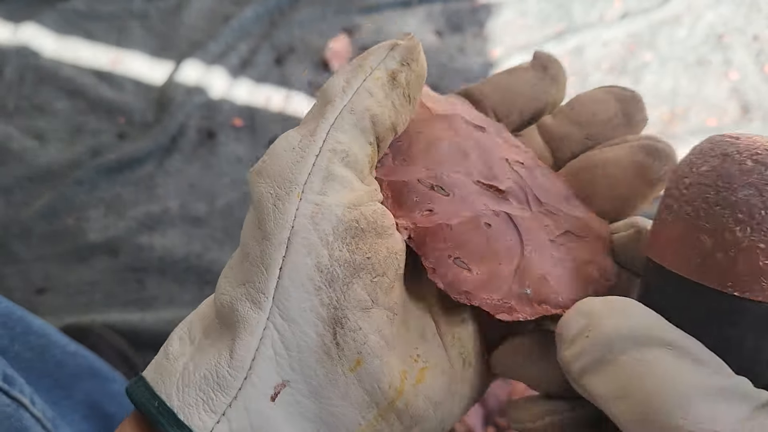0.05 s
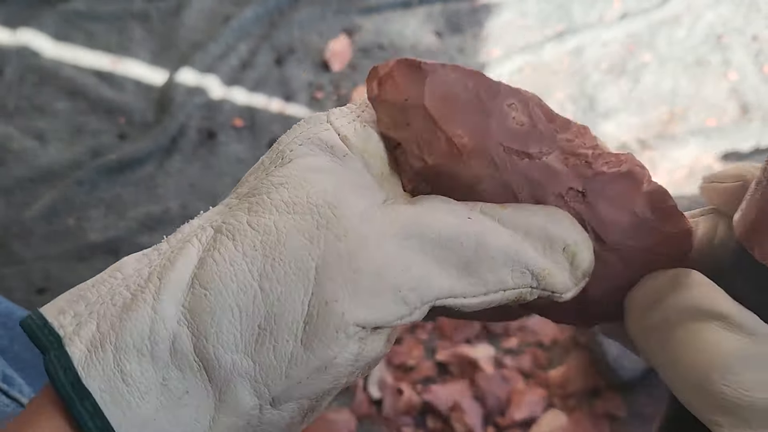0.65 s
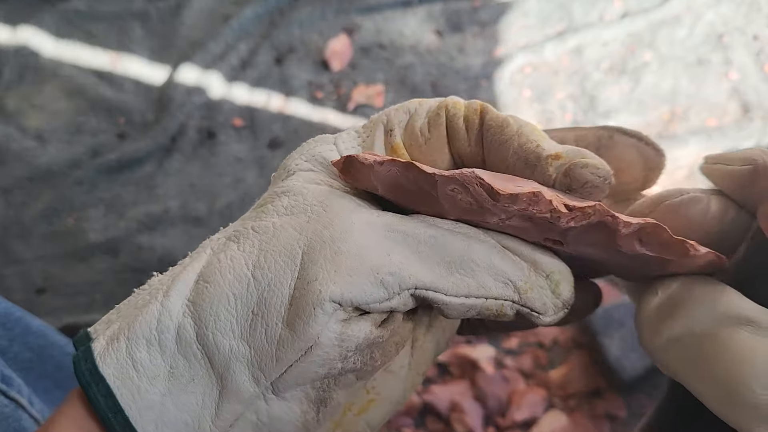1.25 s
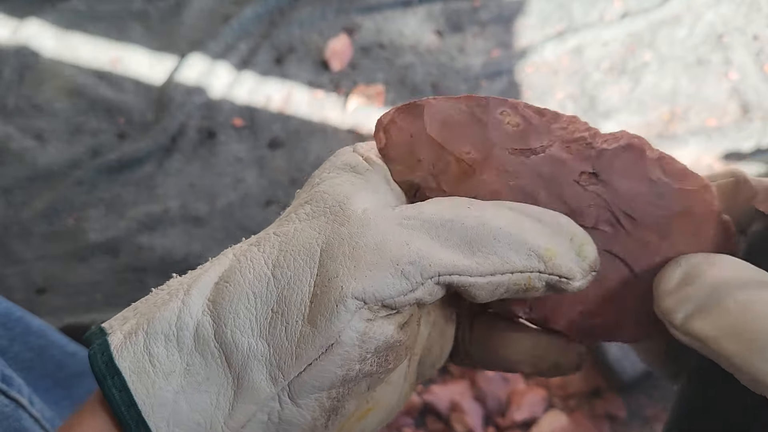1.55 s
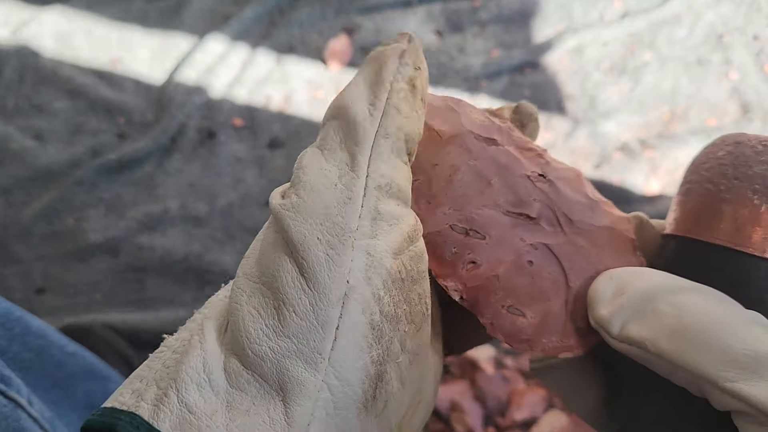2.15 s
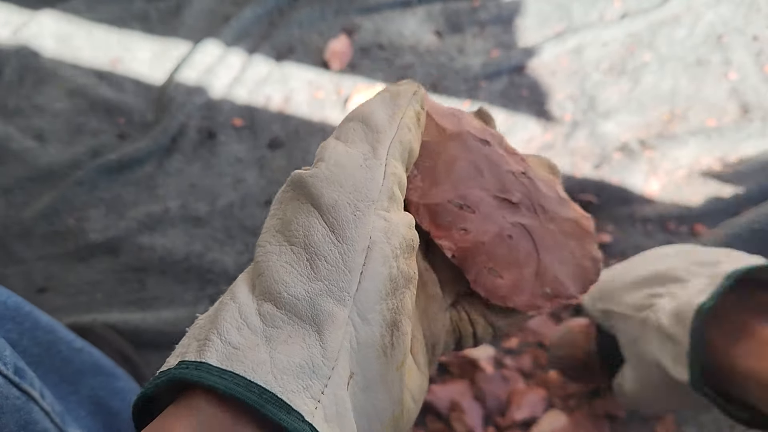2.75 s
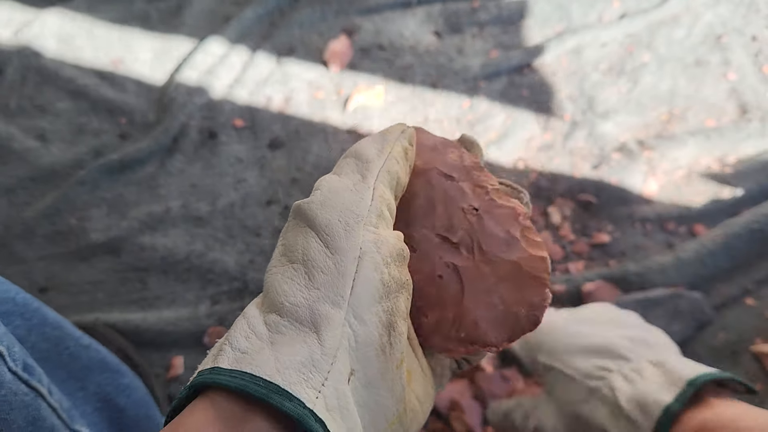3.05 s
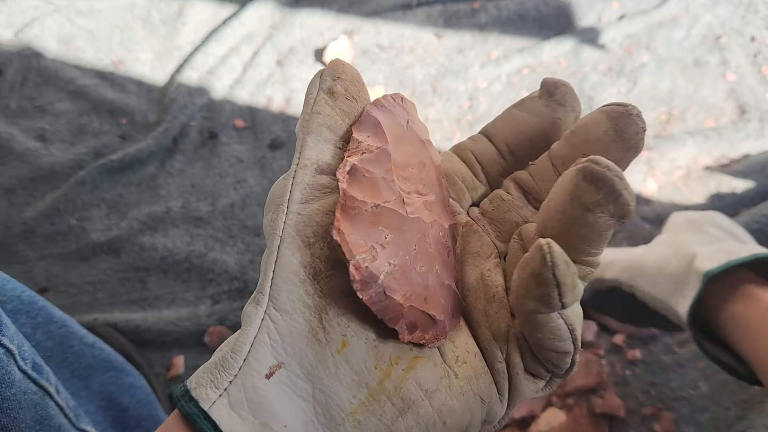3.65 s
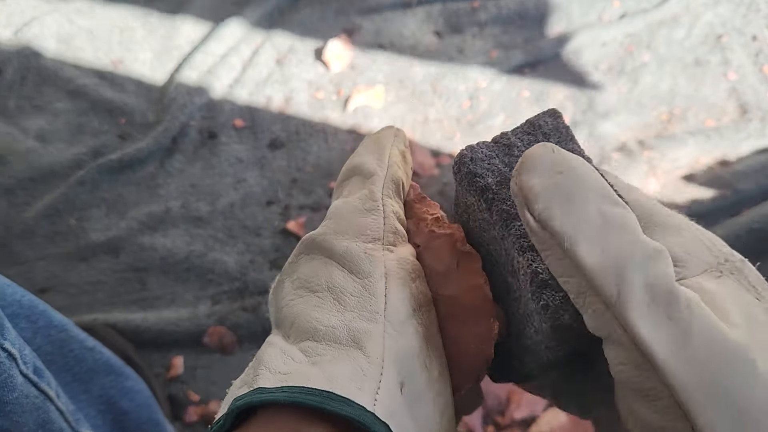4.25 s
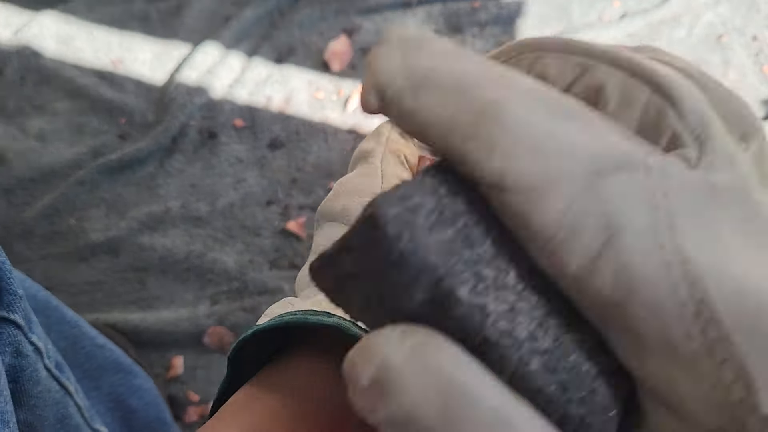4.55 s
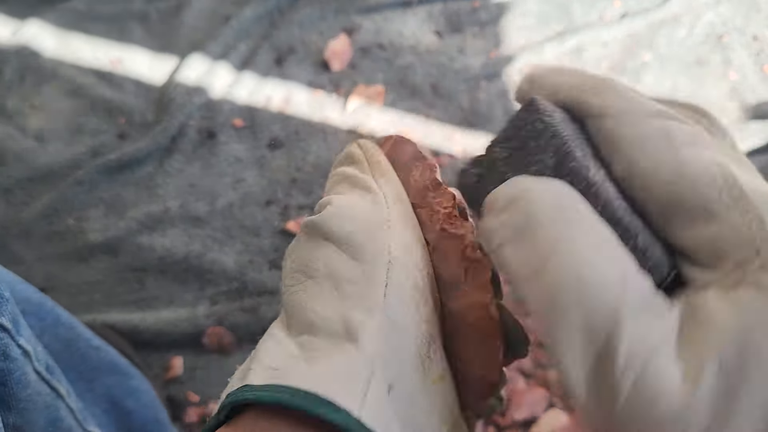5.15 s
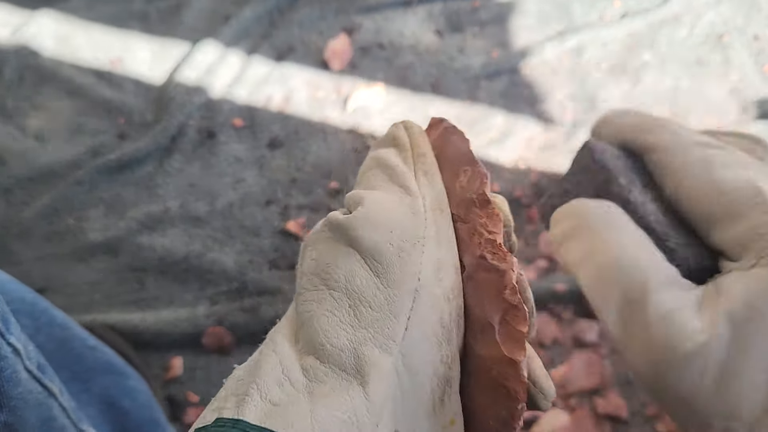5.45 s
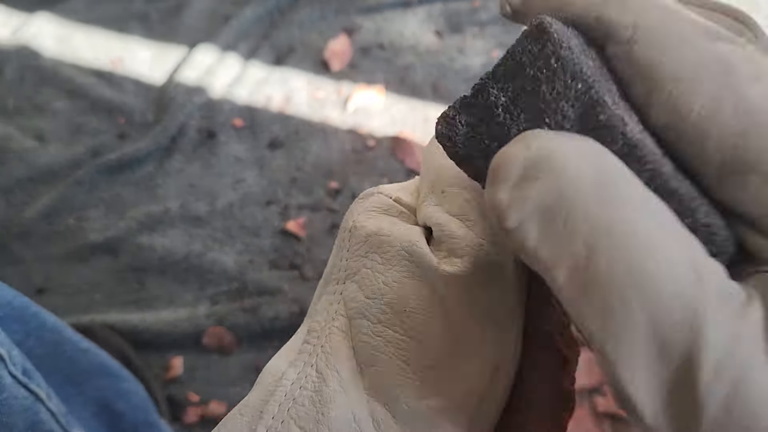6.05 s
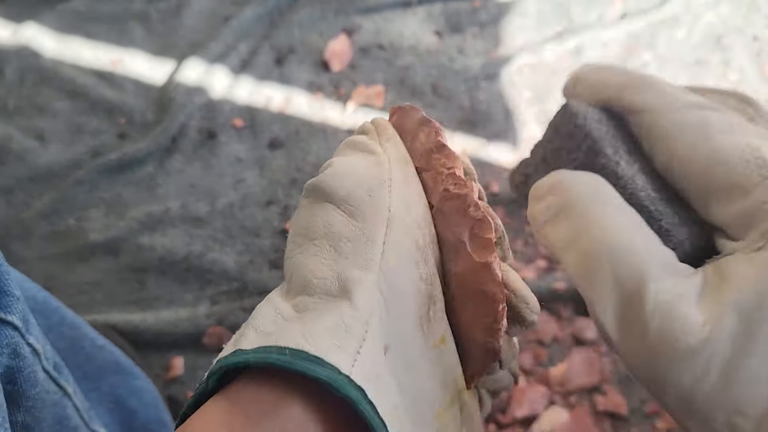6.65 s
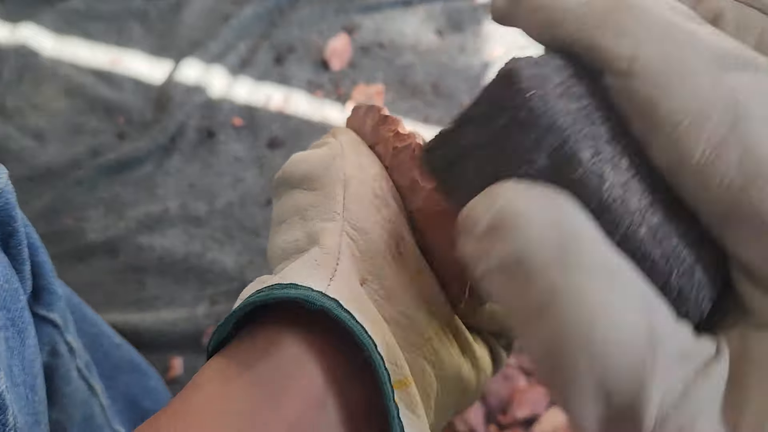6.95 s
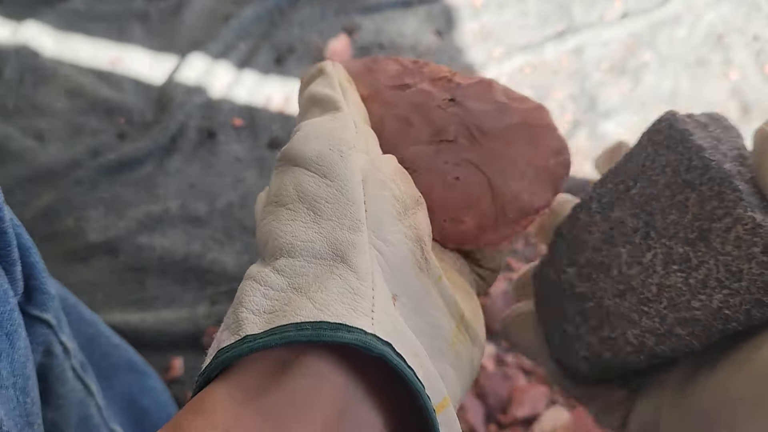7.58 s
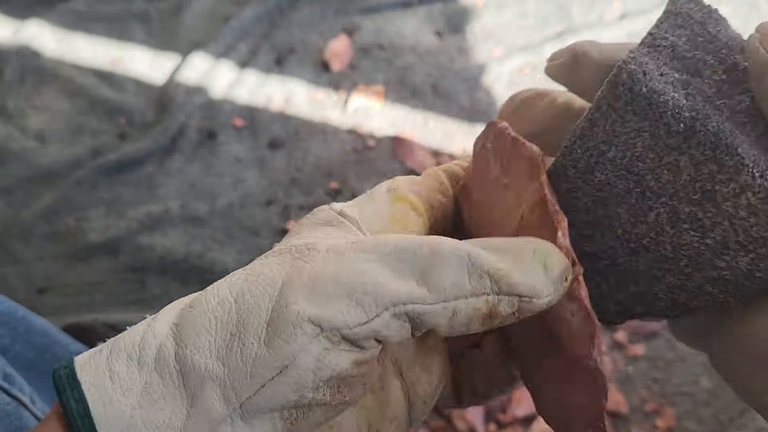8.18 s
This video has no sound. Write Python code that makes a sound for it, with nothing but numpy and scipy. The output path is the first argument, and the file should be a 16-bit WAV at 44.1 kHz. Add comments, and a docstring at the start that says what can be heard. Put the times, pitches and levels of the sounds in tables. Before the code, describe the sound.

Close, dry sounds of stone being worked by hand. Faint glove rubbing and low handling rumble come first, then loose chips crunch and clink twice as a tool lands on them. An abrading stone rasps along the edge of a chert blade, about four brief strokes a second, a dozen in all. It ends with delicate stone-on-stone clicks and thin, high ringing against quiet room noise.

```python
"""Abrading a chert blade

Gloved hands turn a chert blade in a quiet workspace; a tool set down among waste flakes makes them
chink. A coarse abrader is swiped twelve times along the edge: it lands, skips and grinds from tooth to
tooth. Each impact excites the damped modes of the gripped stones (a knock) and of the blade (a ring).
Light touches, mostly before and after the swipes, let the loosely held blade ring longer."""
import sys
import numpy as np
from scipy import signal
from scipy.fft import rfft, irfft, next_fast_len
from scipy.io import wavfile
from scipy.ndimage import map_coordinates

SR = 44100
rng = np.random.default_rng(int(sys.argv[2]) if len(sys.argv) > 2 else 0)


def materialize(psi):
    """Save the field psi as 16-bit PCM at rate SR to the path in sys.argv[1].

    A 1-D psi becomes a single channel; in a 2-D psi each row is a channel.
    """
    bounded = np.clip(np.atleast_2d(psi).T, -1, 1)
    quanta = np.round(bounded * 32767).astype(np.int16)
    wavfile.write(sys.argv[1], SR, quanta)


N = 366912

# Dull resonances of the gripped stones, and the blade's bending modes damped by the grip.
# Each row: frequency in Hz, bandwidth in Hz, relative level in dB, left minus right in dB.
KNOCK_MODES = [(218, 88, -21, -4), (639, 170, -15, -0.5), (977, 270, -15.5, 1), (1408, 343, -3.5, -8),
               (1893, 350, -1, -4.5), (2078, 520, 0, -5), (3050, 1430, -2, -3), (4960, 1720, -1, 3.5)]
BLADE_MODES = [(6800, 620, -4, 0), (7170, 540, 0, -3), (10600, 1000, -12.5, 3), (11800, 1000, -14.5, 2),
               (15200, 420, -11, -4)]
# Strokes of the abrader. Each row: landing time, skip and grind durations in seconds, teeth caught,
# landing, tooth and grit levels in dB, ring offset in dB, knock pitch factor,
# ring tilt in dB per octave, jolt of the hands in dB.
SWIPES = [(4.6382, .020, .0435, 3, -12.5, -15.5, -37, 0.6, 1.057, -4, -31.5),
          (4.9143, 0.019, 0.031, 4, -14.5, -20, -20, -5.5, 1.05, -4.5, -37.5),
          (5.1733, 0.012, 0.029, 4, -16.5, -18.5, -23, -7, 1.077, -3, -34),
          (5.4108, 0.012, .034, 4, -12.5, -18, -23, -8, 1.057, -2.5, -31),
          (5.652, 0.017, .027, 4, -13.5, -15.5, -23.5, -3.5, 1.045, -0.5, -37.5),
          (5.889, 0.014, 0.037, 5, -17.5, -21.5, -27, 3.5, 1.01, 3, -39.5),
          (6.126, 0.011, 0.025, 4, -20, -21, -25, 2.5, 1, -9.5, -32),
          (6.362, 0.014, .02, 2, -18, -17.5, -25.5, 3.5, 1.05, -11, -34),
          (6.5974, .014, 0.031, 4, -14.5, -17, -27, -7.5, 1.026, -3, -39.5),
          (6.8326, .018, 0.023, 4, -13, -15.5, -24.5, -8, 1, 1, -35.5),
          (7.0778, 0.021, 0.041, 4, -16, -18, -26, -0.5, 1.03, -5.5, -23.5),
          (7.317, 0.021, 0.023, 3, -12, -20, -23.5, 0, 0.95, -0.5, -32.5)]


def amp(db):
    """Decibels to amplitude ratio."""
    return 10 ** (np.asarray(db) / 20)


def unit(x):
    """The signal scaled to rms 1."""
    return x / np.sqrt(np.mean(x ** 2) + 1e-20)


def clock(seconds):
    """Sample times over a duration."""
    return np.arange(int(seconds * SR)) / SR


def along(points, hz):
    """Interpolation of (Hz, value) points on a logarithmic frequency axis."""
    knots_hz, values = np.transpose(points)
    return np.interp(np.log(hz + 1), np.log(knots_hz), values)


def wobble(rate):
    """Smooth random modulation with `rate` knots a second."""
    knots = rng.standard_normal(int(N * rate / SR) + 4)
    return map_coordinates(knots, [np.arange(N) * rate / SR])


def arch(start, end):
    """Half-sine speed of one movement, from rest to rest."""
    speed = np.zeros(N)
    i = np.arange(max(int(start * SR), 0), min(int(end * SR), N))
    speed[i] = np.sin(np.pi * (i / SR - start) / (end - start))
    return speed


def filtered(x, response):
    """Linear filtering: the spectrum is multiplied by a frequency response."""
    size = x.shape[-1]
    padded = next_fast_len(size + 8192)
    return irfft(rfft(x, padded) * response(np.fft.rfftfreq(padded, 1 / SR)), padded)[..., :size]


def noise(spectrum, side_db, pan_db=0, size=N):
    """Coloured noise of rms 1; an independent side signal decorrelates the channels."""
    mid, side = filtered(rng.standard_normal((2, size)), lambda hz: amp(along(spectrum, hz)))
    side = amp(side_db) * side
    return unit(np.array([amp(pan_db) * (mid + side), mid - side]))


def add(track, start, sound):
    """Superposition of a stereo sound on a track, from `start` seconds."""
    part = track[:, round(start * SR):][:, :sound.shape[1]]
    part += sound[:, :part.shape[1]]


def in_room(sound, wet_db, build_s=0.0054):
    """Reverberation: a diffuse tail builds up behind the direct sound and decays exponentially."""
    # Decay of the room. Each row: frequency in Hz, T60 in seconds.
    decay_times = [(200, 0.16), (1500, 0.12), (7000, 0.13), (15000, 0.14)]
    hz, t, spectra = signal.stft(rng.standard_normal((2, SR // 3)), SR, nperseg=256)
    tail = signal.istft(spectra * amp(-60 * t / along(decay_times, hz)[:, None]), SR, nperseg=256)[1]
    tail *= 1 - np.exp(-np.arange(tail.shape[1]) / SR / build_s)
    response = amp(wet_db) * tail / np.linalg.norm(tail[0])
    response[:, 0] += 1
    return signal.fftconvolve(sound, response, axes=1)


def near_reflections(sound, echo_db=-16.5, count=9):
    """Comb filtering: weak echoes from hands, abrader and lap interfere anew in each pose."""
    paths = np.zeros((2, SR // 50))
    paths[:, 0] = 1
    delays_s = rng.uniform(.0008, .008, (count, 1)) + rng.uniform(0, .0002, (count, 2))
    for delay, sign in zip(delays_s, rng.choice([-1, 1], count)):
        paths[[0, 1], (delay * SR).astype(int)] += sign * amp(echo_db)
    return signal.fftconvolve(sound, paths, axes=1)


def background(air_db=1, hum_db=-1):
    """Broadband room noise swells slowly, with narrow noise bands heard as a faint hum and whir."""
    # Course of the room noise. Each row: time in seconds, level in dB.
    air_levels = [(1.8, -60.5), (3.4, -56), (7.7, -55.5), (8.2, -51.5)]
    # Its spectrum. Each row: frequency in Hz, relative density in dB.
    air_spectrum = [(59, -62), (100, -12), (135, -3.5), (234, -14.5), (365, -15), (492, -20), (558, -19),
                    (1130, -18), (1330, -19), (2270, -19.5), (3780, -26.5), (5080, -26), (6290, -34.5),
                    (7770, -32), (16000, -61.5)]
    # Hum and whir. Each row: centre in Hz, half width in Hz, level in dB.
    hum_bands = [(229.2, 10, -61), (304.5, 16, -65), (381.2, 7.7, -69.5), (2250, 220, -70)]
    level = amp(np.interp(np.arange(N) / SR, *np.transpose(air_levels)))
    hum = 0
    for centre, width, db in hum_bands:
        band = filtered(rng.standard_normal(N), lambda hz: np.exp(-((hz - centre) / width) ** 2))
        hum += amp(db + hum_db) * unit(band)
    return level * amp(air_db) * noise(air_spectrum, side_db=0, pan_db=-1.5) + unit(level) * hum


def handling(still_db=-55, waver_db=2.4, flutter_db=3):
    """Friction noise follows speed: moving hands rumble and rub leather over stone."""
    # Turns and regrips. Each row: start and end in seconds, rumble, scuff and hiss levels in dB.
    moves = [(-.05, .187, -68, -59.5, -66.5), (.21, 0.364, -46, -87, -96), (0.506, 0.645, -43, -68, -69.5),
             (0.606, 0.862, -47, -58.5, -64), (1.178, 1.41, -40, -65.5, -72),
             (1.367, 1.63, -44, -65.5, -84), (1.59, 1.896, -41, -67, -66), (1.747, 2.244, -47.5, -61, -61),
             (2.313, 2.7, -70, -63, -63.5), (2.63, 2.797, -39.5, -74, -74), (2.822, 3.026, -36, -70, -80),
             (3.035, 3.138, -36, -56, -52.5), (3.09, 3.464, -45.5, -76, -56),
             (3.792, 3.996, -38.5, -74, -71), (4.11, 4.353, -49, -54.5, -62.5),
             (4.476, 4.592, -48.5, -67, -78), (7.428, 7.672, -41.5, -74, -62), (7.69, 7.904, -38, -76, -68),
             (7.897, 8.26, -45, -59.5, -66)]
    # The arm's return swing between swipes: rumble, scuff and hiss levels in dB.
    return_db = (-50, -84.5, -72.5)
    # Spectra of the hands and gloves. Each row: frequency in Hz, relative density in dB.
    rumble_spectrum = [(15, -47), (25, -10), (45, -7), (63, -1.5), (90, -8), (130, -12.5), (180, -25.5),
                       (260, -30.5), (400, -54), (800, -107)]
    scuff_spectrum = [(500, -22.5), (900, -10.5), (1400, -2), (2000, -14), (4000, -21.5), (9000, -63)]
    hiss_spectrum = [(1000, -21.5), (2500, -11), (5000, -9), (8000, -11.5), (16000, -21)]
    return_after_s, return_s = 0.084, 0.13
    jolt_lead_s, jolt_s = 0.012, 0.09  # the hands give way under each swipe
    returns = [(s + return_after_s, s + return_after_s + return_s, *return_db) for s, *_ in SWIPES[:-1]]
    sway, scuff, hiss = sum(amp(db)[:, None] * arch(start, end) for start, end, *db in moves + returns)
    jolts = sum(amp(db) * arch(s - jolt_lead_s, s - jolt_lead_s + jolt_s) for s, *_, db in SWIPES)
    motion = np.hypot(amp(still_db), sway + jolts) * amp(waver_db * wobble(22))
    rumble = motion * noise(rumble_spectrum, side_db=-12.5, pan_db=1.5)
    rustle = scuff * noise(scuff_spectrum, side_db=1) + hiss * noise(hiss_spectrum, side_db=0.5)
    return rumble + amp(flutter_db * wobble(70)) * rustle


def flake_pile(grain_db=4, chink_rise_s=0.0006, thud_rise_s=0.0019):
    """Impact of a tool set down: flakes vibrate freely, chips crunch and the ground thuds."""
    # Modes of each waste flake. Each row: frequency in Hz, relative level in dB, T60 in seconds.
    flake_modes = {"broad": [(6320, 3, 0.13), (11950, -7, .16)], "thin": [(10440, -3, 0.15),
                   (12200, -8, 0.12), (4600, -9, .07)], "small": [(7770, 4, 0.027), (12650, -20, 0.095)],
                   "sliver": [(15650, 0, 0.17)]}
    # Blows on the flakes. Each row: start in seconds, flake, level in dB.
    chinks = [(3.066, "thin", -28), (3.067, "broad", -37.5), (3.156, "thin", -41), (3.193, "broad", -29),
              (3.209, "sliver", -28), (3.226, "broad", -27.5), (3.236, "small", -16),
              (3.236, "sliver", -25), (3.29, "small", -28.5), (3.337, "sliver", -45),
              (3.352, "broad", -39.5), (3.575, "small", -51)]
    # Loose chips shifting. Each row: start in seconds, level in dB, rise and T60 in seconds.
    crunches = [(0.105, -39, 0.0013, 0.032), (3.065, -14, 0.0027, 0.046), (3.076, -45, 0.0019, 0.099),
                (3.17, -39.5, 0.0052, 0.15), (3.229, -27, 0.005, 0.061), (3.35, -49, 0.0023, 0.062)]
    # The tool's weight landing. Each row: start in seconds, level in dB, T60 in seconds.
    thuds = [(3.076, -16.5, 0.037), (3.237, -37.5, 0.12)]
    # Spectra of chips and ground. Each row: frequency in Hz, relative density in dB.
    chip_spectrum = [(300, -16.5), (1200, -22.5), (3000, -11.5), (4700, -4.5), (7000, 0), (12000, 2.5),
                     (16000, 4)]
    ground_spectrum = [(25, -5), (50, 2), (120, -0.5), (300, -12.5), (520, -8), (800, -20), (2000, -33),
                       (4000, -37)]
    out, t = np.zeros((2, N)), clock(0.16)
    for start, flake, blow_db in chinks:
        for hz, db, t60 in flake_modes[flake]:
            phase = np.array([[0], [rng.uniform(-2.9, 0.67)]])
            envelope = amp(blow_db + db - 60 * t / t60) * (1 - np.exp(-t / chink_rise_s))
            ring = envelope * np.sin(2 * np.pi * hz * t + phase) * amp([[-1], [1]])
            add(out, start, in_room(ring, wet_db=-6.5))
    for start, db, rise, t60 in crunches:
        grains = unit(np.repeat(amp(grain_db * rng.standard_normal(len(t))), 32)[:len(t)])
        envelope = np.minimum(t / rise, 1) * amp(db - 60 * np.maximum(t - rise, 0) / t60)
        chips = noise(chip_spectrum, side_db=2, pan_db=-0.5, size=len(t))
        add(out, start, in_room(envelope * grains * chips, wet_db=-4))
    for start, db, t60 in thuds:
        envelope = amp(db - 60 * t / t60) * (1 - np.exp(-t / thud_rise_s))
        add(out, start, envelope * noise(ground_spectrum, side_db=-12.5, size=len(t)))
    return out


def modal_ring(modes, detune, rise_s=0.000094, left_lag_s=0.00017):
    """Free vibration as a sum of damped sines; the spot struck shifts and weights each mode."""
    hz, width, db, pan = np.transpose(modes)[:, :, None]
    shift, strength, lean = rng.standard_normal((3, len(hz), 1))
    hz, db, pan = hz + detune * width * shift, db + 3 * strength, pan + 3 * lean
    polarity = (-1) ** np.arange(len(hz))[:, None]
    channels = []
    for side, delay in ((1, rng.normal(left_lag_s, .00002)), (-1, 0)):
        t = np.maximum(clock(np.pi / width.min()) - delay, 0)
        gain = polarity * np.sqrt(width) * amp(db + side * pan / 2)
        partials = gain * np.exp(-np.pi * width * t) * np.sin(2 * np.pi * hz * t)
        channels.append(partials.sum(0) * (1 - np.exp(-t / rise_s)))
    ring = np.array(channels)
    return ring / np.sqrt(np.mean(ring[:, :132] ** 2))  # rms 1 over the first 3 ms


def gripped(modes, pitch, tilt_db, vary_db=0.82):
    """Boundary conditions: each grip retunes the modes and changes their strengths."""
    hz, width, db, pan = np.transpose(modes)
    db = db + tilt_db * np.log2(hz / hz[0]) - vary_db * rng.standard_normal(len(hz))
    return np.transpose([hz * pitch, width, db, pan])


def toward_tip(knock_db, ring_db, place, fade_db=1.5, rise_db=5):
    """Excitation depends on position: toward the tip (place 0 to 1) knock fades and ring grows."""
    knock_db, ring_db = rng.normal([knock_db, ring_db], 1)
    return knock_db - fade_db * (place - .5), ring_db + rise_db * (place - .5)


def impact(knock_db, ring_db, knock=KNOCK_MODES, ring=BLADE_MODES):
    """Impulsive excitation: the stones knock, and the blade rings as the contact lets go."""
    sound = np.zeros((2, SR // 40))
    add(sound, 0, amp(knock_db) * modal_ring(knock, detune=.25, rise_s=.0003, left_lag_s=.00011))
    add(sound, .0003, amp(ring_db) * modal_ring(ring, detune=.3, rise_s=.0002))
    return sound


def grind(seconds, knock_db, ring_db, knock=KNOCK_MODES, ring=BLADE_MODES, rate_hz=520, scatter_db=4.5):
    """Roughness noise: grit crosses the edge as an irregular train of tiny impacts."""
    sound = np.zeros((2, int((seconds + .03) * SR)))
    ticks = max(int(rate_hz * seconds), 1)
    places = (np.arange(ticks) + rng.random(ticks)) / ticks
    sizes = unit(amp(scatter_db * rng.standard_normal(ticks))) / np.sqrt(rate_hz * .003)
    for place, size in zip(places, sizes):
        add(sound, place * seconds, size * impact(*toward_tip(knock_db, ring_db, place), knock, ring))
    return sound


def touches(click_db=-17, flutter_db=6):
    """Light damping: the loosely held blade rings when tapped and sings when driven by friction."""
    # Modes of the loose blade, and of a tap on its tip.
    # Each row: frequency in Hz, bandwidth in Hz, relative level in dB, left minus right in dB.
    loose_modes = [(6944, 44, 0, 0), (11060, 38, -10, 0), (14990, 34, -11, -2)]
    tap_modes = [(1340, 410, -3, -11), (2185, 1300, 4.5, -4), (3220, 2730, 4.5, -13), (5530, 690, -16, 12)]
    # Light taps of stone on stone. Each row: start in seconds, knock and ring levels in dB.
    taps = [(4.194, -35.5, -51), (4.207, -50, -66), (6.784, -50.5, -46.5), (7.9538, -18.5, -27),
            (7.966, -21, -32), (8.068, -58, -47.5), (8.162, -48, -48), (8.194, -29.5, -61),
            (8.294, -39, -39), (8.304, -28.5, -34), (8.317, -32.5, -49)]
    # Light slides. Each row: start and end in seconds, knock, ring and singing levels in dB.
    slides = [(4.169, 4.213, -53, -65, -77), (4.238, 4.285, -52.5, -65, -81), (7.86, 7.95, -68, -75, -67.5),
              (8.024, 8.066, -50.5, -62, -66), (8.117, 8.166, -81, -64, -63), (8.18, 8.192, -64, -64, -50),
              (8.289, 8.321, -37.5, -50, -53)]
    out = np.zeros((2, N))
    for start, knock_db, ring_db in taps:
        tap = impact(knock_db, knock_db + click_db, tap_modes)
        add(out, start, in_room(near_reflections(tap), wet_db=-9))
        add(out, start, in_room(amp(ring_db) * modal_ring(loose_modes, detune=0.3), wet_db=-9.5))
    for start, end, knock_db, ring_db, sing_db in slides:
        add(out, start, in_room(grind(end - start, knock_db, ring_db, tap_modes), wet_db=-12))
        friction, pressure = rng.standard_normal((2, 1, len(clock(end - start))))
        force = friction * amp(flutter_db * pressure)
        song = signal.fftconvolve(force, modal_ring(loose_modes, detune=.1), axes=1)
        add(out, start, in_room(amp(sing_db) * unit(song), wet_db=-3.5))
    return out


def abrading(ping_db=-2, chatter_db=-10, tooth_jitter=0.12):
    """An impact train: the abrader lands, skips, then catches tooth after tooth, chattering on each."""
    landing_ring_db, grit_ring_db = -5, 2  # added to the swipe's ring offset
    overhang_s = 0.003  # grit sounds just before the first tooth and after the last
    dulling = 0.15  # the knock's treble falls as the ring grows, in dB per octave per dB
    mean_ring_db = np.transpose(SWIPES)[7].mean()
    out = np.zeros((2, N))
    for start, skip, length, teeth, landing_db, tooth_db, grit_db, ring_db, pitch, tilt_db, _ in SWIPES:
        knock = gripped(KNOCK_MODES, pitch, dulling * (mean_ring_db - ring_db))
        ring = gripped(BLADE_MODES, 1, tilt_db)
        places = np.linspace(0, 1, teeth)
        places[1:-1] += tooth_jitter * rng.standard_normal(teeth - 2) / teeth
        landing_ring = gripped(BLADE_MODES, pitch=0.94, tilt_db=2)  # a hard blow favours high modes
        catches = [(0, landing_ring, landing_db, landing_db + ring_db + landing_ring_db)]
        for place in places:
            levels_db = toward_tip(tooth_db, tooth_db + ring_db, place)
            catches.append((skip + place * length, ring, *levels_db))
        swipe = np.zeros((2, SR // 7))
        for after, blade, hit_db, blade_db in catches:
            add(swipe, after, impact(hit_db, blade_db + ping_db, knock, blade))
            chatter = grind(0.003, hit_db, blade_db + ping_db, knock, ring)
            add(swipe, after + .0005, amp(chatter_db) * chatter)
        grit = grind(length + 2 * overhang_s, grit_db, grit_db + ring_db + grit_ring_db, knock, ring)
        add(swipe, max(skip - overhang_s, 0), grit)
        add(out, start, in_room(near_reflections(swipe), wet_db=-10))
    return out


def scene():
    """Superposition of all sources in stereo."""
    return abrading() + touches() + flake_pile() + handling() + background()


def record(dry):
    """Soft saturation rounds the highest peaks, and a steep low-pass limits the band."""
    cutoff_hz = 16100
    rounded = dry / (1 + np.abs(dry) ** 6) ** (1 / 6)
    return filtered(rounded, lambda hz: 1 / np.sqrt(1 + (hz / cutoff_hz) ** 160))


dry = scene()
out = record(dry)
materialize(out)
```